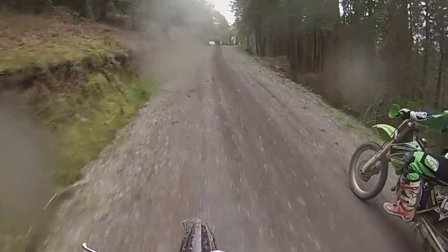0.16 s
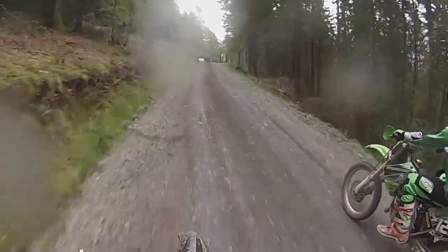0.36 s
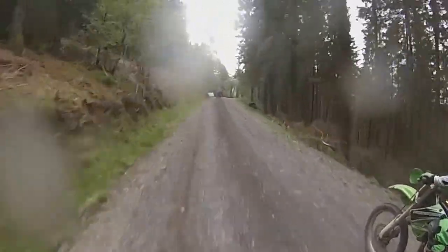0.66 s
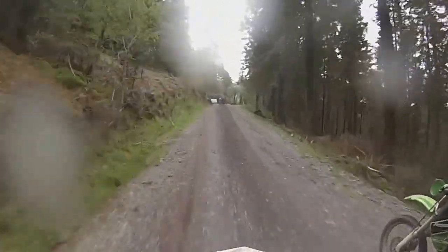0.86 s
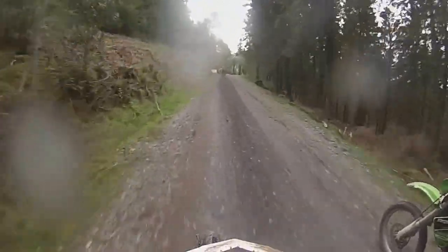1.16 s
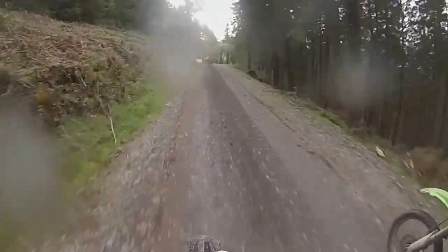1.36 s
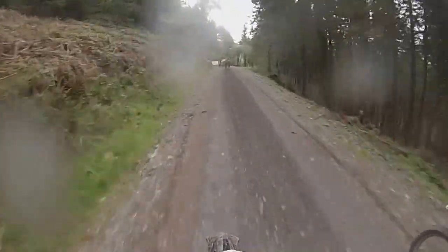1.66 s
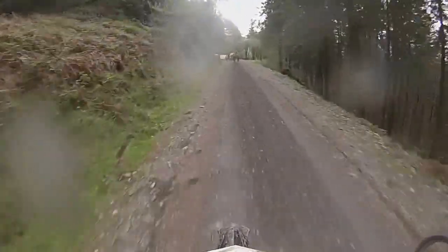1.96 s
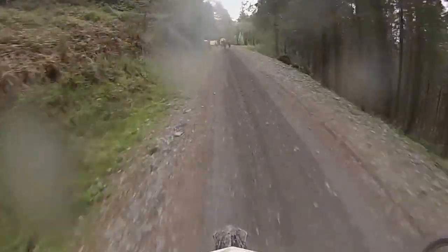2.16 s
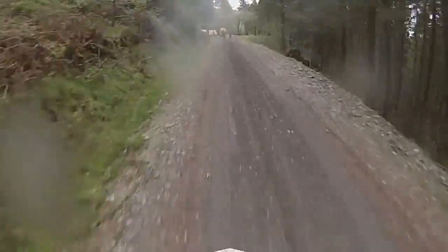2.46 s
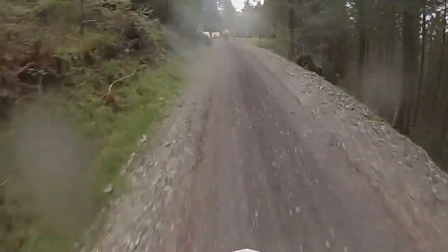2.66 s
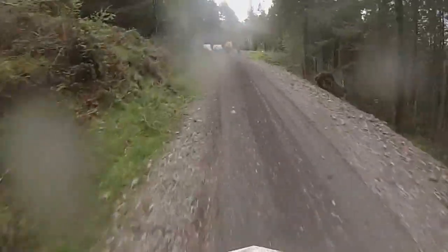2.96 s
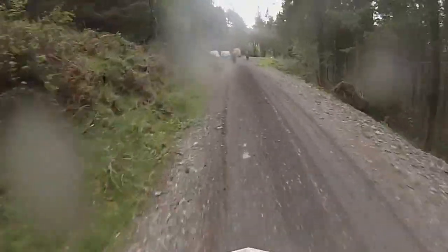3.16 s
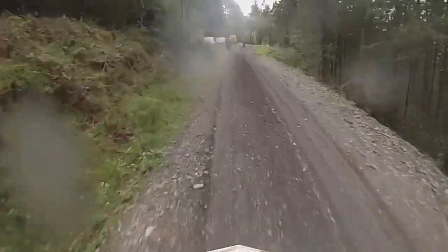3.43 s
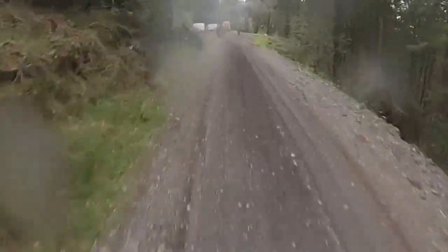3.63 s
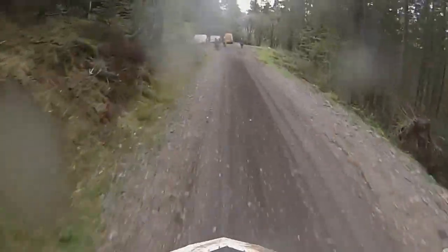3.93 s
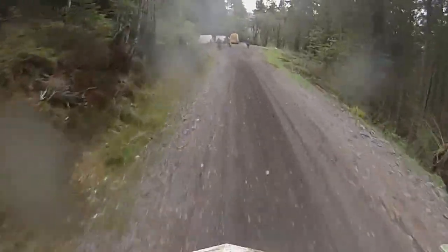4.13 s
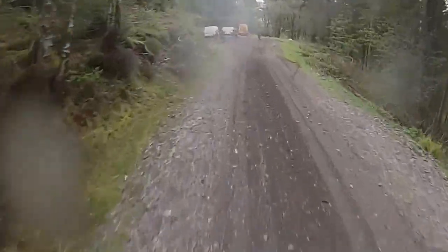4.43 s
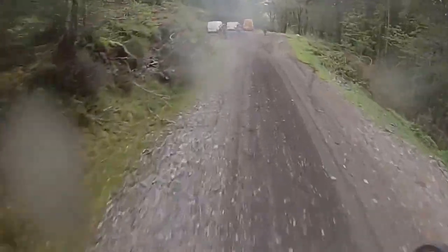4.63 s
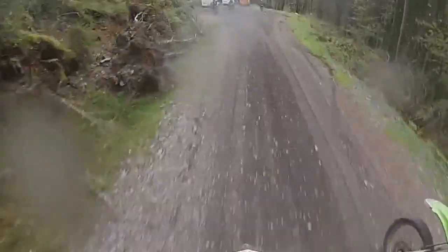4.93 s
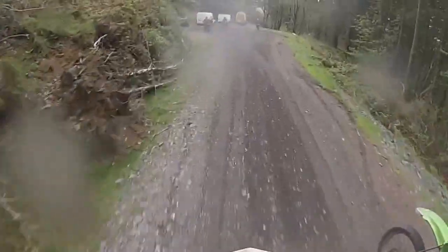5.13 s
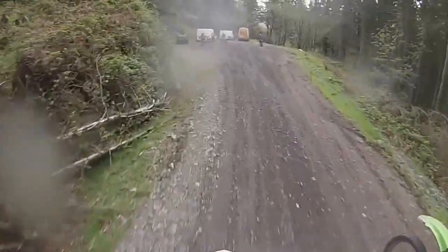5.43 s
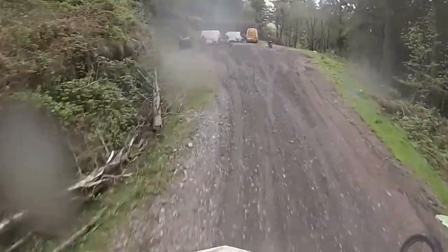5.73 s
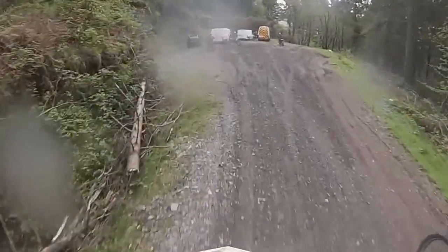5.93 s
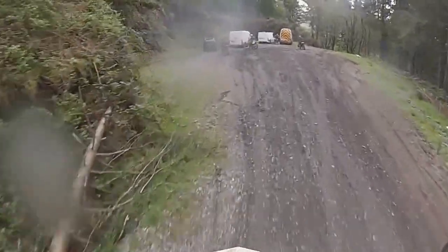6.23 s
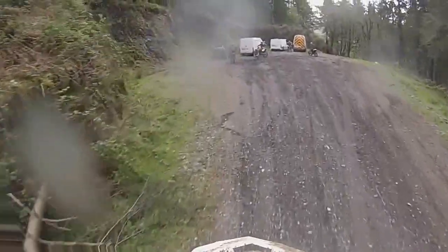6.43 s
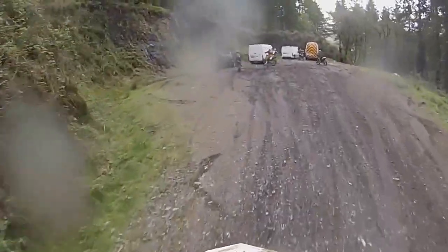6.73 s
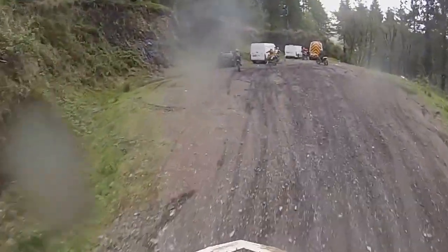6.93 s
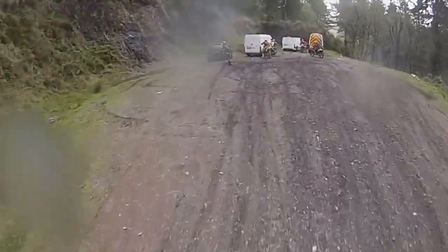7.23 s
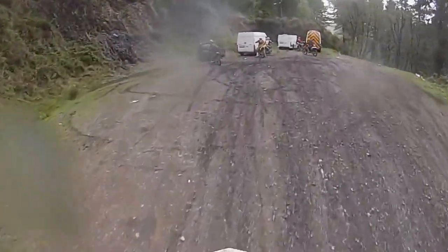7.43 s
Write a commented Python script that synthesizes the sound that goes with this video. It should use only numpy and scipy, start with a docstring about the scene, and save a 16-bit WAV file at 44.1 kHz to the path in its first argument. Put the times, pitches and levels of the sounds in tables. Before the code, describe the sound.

Heard from the rider's helmet, an off-road motorcycle's engine drone and wind rush fade as it slows over gravel, ending in slow exhaust thuds.

```python
"""A single-cylinder four-stroke dirt bike slows on a gravel forest track, heard from the rider's helmet.
First the exhaust drones as pulses ringing a silencer, while noise shaped as eddies booms in the helmet.
The throttle shuts, firing slows, and the rush of air, chain and tyres, noise ringing the camera case, fades.
Then stones knock a panel as struck resonances, stray firings pop, and noise in a narrow band sings as the disc.
Last, grit scuffs under the tyre and the exhaust settles into a thudding idle with an echo along the pipe."""
import sys
import numpy as np
from scipy import signal
from scipy.fft import rfft, irfft
from scipy.io import wavfile
from scipy.ndimage import uniform_filter1d

SR = 44100
rng = np.random.default_rng(int(sys.argv[2]) if len(sys.argv) > 2 else 0)


def file_out(sig):
    """Save sig as 16-bit WAV at sys.argv[1]."""
    # one column per channel
    cols = np.atleast_2d(sig).T
    # limit, then scale
    lim = np.clip(cols, -1, 1)
    pcm = np.round(lim * 32767).astype(np.int16)
    wavfile.write(sys.argv[1], SR, pcm)


N = 334719
T = np.arange(N) / SR  # time [s]

# Spectrum levels are relative. The half length of a swell runs from its peak to 1/e of its gain.

# Wind: eddies booming in the helmet (frequency [Hz], level [dB])
BOOM_SPECTRUM = [(30, -30), (70, -25), (95, -14), (108, -3), (118, 0), (132, -6), (155, -19), (200, -27),
                 (450, -32), (900, -46)]
# Wind: buffeting of the microphone (frequency [Hz], level [dB])
BUFFET_SPECTRUM = [(5, -14), (13, 0), (24, 0), (36, -5), (60, -12), (120, -26), (400, -50)]
# Eddies that boom in the helmet (time [s], half length [s], level [dB])
EDDIES = [(.15, 0.087, -29.5), (.46, .06, -26), (1.05, 0.065, -33), (1.31, 0.074, -35), (1.68, .05, -34),
          (1.94, 0.046, -31), (2.31, 0.033, -31.5)]
# Gusts on the microphone (time [s], half length [s], level [dB])
GUSTS = [(3.3, .1, -53), (4.08, .13, -40), (5, .14, -41), (5.52, .13, -45), (6.4, 0.48, -48)]
# Boom at the reference rush; dB lost for each dB that the rush loses; change at a crawl
BOOM_DB, BOOM_SLOPE, BOOM_CRAWL_DB = -33.5, 0.51, -4.5
BUFFET_START_DB, BUFFET_FALL_DB_PER_S = -47, 1
CRAWL_S, SLOWING_S = 6.95, 0.27  # the bike is down to a crawl by then, and takes this long to get there

# Resonances of the camera case (frequency [Hz], width [Hz], lift [dB])
CASE = [(1586, 220, 5.5), (2490, 50, -2), (2594, 100, 6), (4840, 110, 1.5), (5840, 570, 7),
        (6810, 160, -12), (7020, 490, 6), (8080, 260, -6), (11010, 450, -8.5), (12100, 500, -6)]

# Tyres drumming on the track (frequency [Hz], level [dB])
DRUM_SPECTRUM = [(35, -25), (60, -6), (88, -3), (110, -1), (160, -26.5), (400, -43)]
# Bursts of rumble from rough ground (time [s], half length [s], level [dB])
ROUGH_GROUND = [(4.15, .3, -42)]
DRUM_DB = -44

# Fine, sparkling treble crackle (frequency [Hz], level [dB])
CRACKLE_SPECTRUM = [(1500, -18), (4000, 1), (6000, 1), (8000, -10), (10000, -2), (15000, -5)]
CRACKLE_DB, CRACKLE_FLICKER_DB = -57, 4.5  # middle level; flicker for each unit of the wander

# Grit scuffing under the tyre (frequency [Hz], level [dB])
SCUFF_SPECTRUM = [(120, -19), (290, 16), (470, 10), (750, -8), (1500, -2), (4500, -1.5), (6200, -6),
                  (8000, -19), (10000, -8), (15000, -25)]
# Short scuffs of grit (time [s], half length [s], level [dB])
SCUFFS = [(7.138, 0.013, -33.5), (7.182, 0.029, -35.5)]

# Ring of the brake disc (frequency [Hz], level [dB])
DISC_SPECTRUM = [(600, -54), (1250, -25), (1490, -8.5), (1555, 2), (1620, -18), (1900, -19.5), (4000, -45)]
# Squeezes of the brake (time [s], half length [s], level [dB])
SQUEEZES = [(3.35, 0.29, -44), (6.5, 0.17, -47), (7.22, 0.047, -41)]
# The drag rises throughout, along a line through this level at this time, just past the end
DRAG_DB, DRAG_S, DRAG_RISE_DB_PER_S = -43.5, 7.8, 5

# Stones flung against the bike (time [s], peak level before a 0.5 dB lift and the skip's overlap [dB])
STONES = [(3.2142, -15.5), (4.596, -17.5), (4.629, -24), (4.711, -29), (4.747, -29), (6.709, -17.5)]
# Knock of a stone (frequency [Hz], level [dB])
STONE_SPECTRUM = [(400, -19), (800, -11), (1050, -0.5), (1600, 10), (2700, 1.5), (3500, -13), (8000, -21),
                  (15000, -36)]
# Resonances of the struck panel (frequency [Hz], width [Hz], lift [dB])
PANEL = [(1060, 99, 11), (1610, 180, 8), (2610, 230, 13.5)]
SKIP_S, SKIP_DB = 0.00167, -12  # each stone touches again, more softly

# Rush of air and chain, falling with road speed (time [s], level before a 1 dB cut and the bumps [dB])
RIDE = [(.6, -20.5), (.76, -19), (1, -21), (1.22, -19), (1.6, -25.5), (2.15, -26), (2.42, -29),
        (3.4, -34.5), (4.5, -39), (4.63, -36.5), (5.7, -40.5), (6.8, -42), (7.05, -46), (7.59, -45.5)]
# Rush of air, chain and clatter (frequency [Hz], level per Hz [dB])
RUSH_SPECTRUM = [(200, -9), (500, -25.5), (850, -22), (1150, -19), (1400, -5.5), (1700, -0.5), (2050, -1.5),
                 (2350, -4.5), (2900, -1), (3550, -1), (4100, -17.5), (6000, -26.5), (12000, -27),
                 (15000, -47)]
# Tyre hiss (frequency [Hz], level per Hz [dB])
HISS_SPECTRUM = [(200, 1), (500, 3), (850, -5), (1500, 3), (2500, 2.5), (3500, 0), (4600, -2.5), (6200, -5),
                 (7400, -12.5), (8100, -15.5), (9200, -13), (10300, -11.5), (13000, -15.5), (15200, -23)]
# Patches of loose gravel under the tyres (time [s], half length [s], level before the flicker [dB])
LOOSE_GRAVEL = [(.58, .15, -34.5), (5.5, 0.059, -50)]
FAST_RUSH_DB = -20  # reference rush, at which boom and hiss have their stated levels
HISS_DB, HISS_SLOPE = -29, 0.57  # hiss at the reference rush; dB lost for each dB that the rush loses
SLOW_RUSH_HZ = 3050  # a slow rush has lost most of what lies above this

# Gas churning in the pipe (frequency [Hz], level [dB])
GAS_SPECTRUM = [(90, -18), (190, 0), (250, -5.5), (320, 3), (390, -2.5), (500, -12.5), (640, -7.5),
                (900, -30), (2000, -28)]
# Standing waves of the silencer (frequency [Hz], width [Hz], lift [dB])
SILENCER = [(170.2, 66, 6.5), (300.5, 34, 5.5), (430, 100, 3)]
# Gurgles as the throttle shuts and as firing resumes (time [s], half length [s], level [dB])
GURGLES = [(.8, 0.15, -36), (5.12, 0.17, -57)]
CHURN_START_DB, CHURN_FALL_DB_PER_S, CHURN_CRAWL_DB = -45, 0.3, -1

# Stray firings while coasting (time [s], peak level before a 5.5 dB cut [dB])
POPS = [(4.333, -29), (5.026, -25), (5.15, -23), (5.274, -26), (5.402, -20.5), (5.532, -24), (6.055, -23),
        (6.301, -22), (6.457, -25), (6.503, -26), (6.734, -26.5), (6.826, -21), (6.927, -24.5), (6.98, -24),
        (7.085, -23.5), (7.195, -20.5)]
# One slow firing (frequency [Hz], level [dB])
THUD_SPECTRUM = [(25, -43), (50, -8), (85, 2), (165, 1.5), (280, 1.5), (345, -5.5), (440, 3), (520, -14),
                 (650, -37), (1000, -63), (2000, -49)]
PIPE_ECHO_S, PIPE_ECHO = 0.0123, 0.52  # delay and gain of the pulse returning along the pipe

# Engine speed (time [s], firing rate [Hz])
ENGINE = [(0.06, 55.2), (0.5, 57.7), (0.88, 54.3), (0.97, 50.7), (1.21, 51.7), (1.61, 50.1), (2.24, 46.3),
          (3.0, 41.5), (3.52, 40.6), (4.37, 35.4), (4.89, 33.4), (5.2, 31.5), (5.84, 29.3), (6.49, 25.4),
          (6.75, 20.8), (7.08, 18.6)]
# Exhaust under throttle (frequency [Hz], level [dB])
PULL_SPECTRUM = [(30, -34), (57, 11.5), (115, 19), (172, -9), (230, 4), (290, 1), (345, -1.5), (400, -16),
                 (460, -5.5), (630, -9), (740, -21), (1000, -28), (2000, -55)]
# Exhaust while coasting (frequency [Hz], level [dB])
COAST_SPECTRUM = [(30, -28), (50, -15), (66, -0.5), (100, -9.5), (125, -10.5), (168, 1.5), (205, -4),
                  (260, -4), (315, -13.5), (360, -16), (455, -5.5), (530, -18), (800, -27), (2000, -26)]
# Exhaust before the idle lifts it (time [s], body level [dB], bark level [dB])
EXHAUST = [(.45, -28.5, -28.5), (.7, -33, -31), (1, -29, -33), (2.2, -32.5, -39.5), (3.6, -35.5, -46.5),
           (4.7, -43.5, -58), (5.15, -40, -50), (5.7, -45.5, -56.5), (7.1, -49.5, -52)]
IDLE_BEAT_S = 7.354  # one nominal firing of the idle
THROTTLE_SHUT_S, THROTTLE_CLOSING_S = 0.947, 0.25  # shut by then, and takes this long to close
IDLE_CATCH_S, IDLE_CATCH_RISE_S = 7.29, 0.046  # the idle has caught by then, over this rise
IDLE_BODY_DB, IDLE_BARK_DB = 7, 5.5  # lift once the idle catches
WEAK_FIRING_HZ, WEAK_FIRING_PER_HZ = 33, 0.023  # below this rate, share of thud gained with each Hz lost
STEADY_SCATTER_DB, STUMBLE_SCATTER_DB = 1.04, 4.3  # unevenness of strokes: running cleanly, and stumbling
FULL_STUMBLE_HZ, NO_STUMBLE_HZ = 30, 44.3  # firing rates
TOP_HZ = 15250  # upper edge of the treble


def undb(db):
    """Amplitude gain is ten to the power of the decibels over twenty."""
    return 10 ** (np.asarray(db) / 20)


def unit(x):
    """Normalization of power: scale to rms 1."""
    return x / np.sqrt(np.mean(x ** 2))


def steady(x, span_s=.21):
    """Envelope flattening: hold the running rms near 1."""
    power = np.abs(uniform_filter1d(x ** 2, int(span_s * SR)))
    return x / np.sqrt(power + 1e-18)


def curves(table):
    """Linear interpolation in time of each column of a table."""
    s, *columns = np.transpose(table)
    return [np.interp(T, s, c) for c in columns]


def ramp(end_s, length_s):
    """Linear transition from 0 to 1, arriving at the given time."""
    return np.clip(1 + (T - end_s) / length_s, 0, 1)


def swells(table):
    """Superposition of Gaussian gains, one for each row (time [s], half length [s], level [dB])."""
    return sum(undb(db) * np.exp(-((T - s) / length) ** 2) for s, length, db in table)


def walk(rate):
    """Smoothed random steps: a wander with an rms near 0.7."""
    k = max(int(SR / rate), 2)
    steps = np.repeat(rng.standard_normal(N // k + 1), k)
    return 0.85 * uniform_filter1d(steps, k)[:N]


def response(points, bumps=(), size=8192):
    """Minimum phase: a magnitude spectrum with resonant bumps fixes a causal impulse response."""
    f = np.maximum(np.fft.rfftfreq(size, 1 / SR), 1)
    hz, db = np.transpose(points)
    db = np.interp(np.log(f), np.log(hz), db)
    # outside the given points the level falls by 12 dB per octave
    outside = np.maximum(f / hz[-1], 1) * np.maximum(hz[0] / f, 1)
    db = db - 40 * np.log10(outside)
    for centre, width, lift in bumps:
        db = db + lift / (1 + (2 * (f - centre) / width) ** 2)
    # folding the cepstrum onto positive time makes the response causal
    cepstrum = irfft(np.log(undb(db)))
    cepstrum[1:size // 2] *= 2
    cepstrum[size // 2 + 1:] = 0
    return irfft(np.exp(rfft(cepstrum)))


def ring(x, h):
    """Linear filtering: convolve an excitation with an impulse response."""
    return signal.oaconvolve(x, h)[:N]


def clicks(times, sizes):
    """Fractional delay: each impulse is shared between its two nearest samples."""
    at = np.clip(np.asarray(times) * SR, 0, N - 2)
    i = at.astype(int)
    early = np.bincount(i, sizes * (1 - at + i), N)
    late = np.bincount(i + 1, sizes * (at - i), N)
    return early + late


def grit(per_s, spread_db):
    """Shot noise: dense tiny impacts of very unequal size and random sign."""
    chance = rng.random((int(per_s * N / SR), 3))
    size_db = -spread_db * np.log(np.maximum(chance[:, 1], .002))
    sizes = undb(size_db) * np.sign(chance[:, 2] - .5)
    return unit(clicks(chance[:, 0] * N / SR, sizes))


def wind():
    """Turbulence: eddies boom in the helmet's hollow and buffet the microphone, easing as the bike slows."""
    rush_db, = curves(RIDE)
    boom_db = BOOM_DB + BOOM_SLOPE * (rush_db - FAST_RUSH_DB)
    boom_db = boom_db + BOOM_CRAWL_DB * ramp(CRAWL_S, SLOWING_S)
    boom = steady(ring(rng.standard_normal(N), response(BOOM_SPECTRUM)))
    buffet_db = BUFFET_START_DB - BUFFET_FALL_DB_PER_S * T
    buffet = steady(ring(rng.standard_normal(N), response(BUFFET_SPECTRUM)))
    return boom * (undb(boom_db) + swells(EDDIES)) + buffet * (undb(buffet_db) + swells(GUSTS))


def drumming():
    """Random forcing: knobbly tyres drum on the hard track until the bike is down to a crawl."""
    level = undb(DRUM_DB) * (1 - ramp(CRAWL_S, SLOWING_S)) + swells(ROUGH_GROUND)
    return unit(ring(rng.standard_normal(N), response(DRUM_SPECTRUM))) * level


def crackle():
    """Shot noise: a fine, sparkling treble crackle that flickers in level and ends at a crawl."""
    level = undb(CRACKLE_DB + CRACKLE_FLICKER_DB * walk(28)) * (1 - ramp(CRAWL_S, SLOWING_S))
    sparkle = ring(grit(per_s=3000, spread_db=1.0), response(CRACKLE_SPECTRUM, CASE))
    return unit(sparkle) * level


def scuffing():
    """Friction noise: grit scuffs under the tyre in short bursts."""
    return unit(ring(rng.standard_normal(N), response(SCUFF_SPECTRUM, CASE))) * swells(SCUFFS)


def braking():
    """Resonance under random friction: the dragging pads set the brake disc singing."""
    drag = undb(DRAG_DB - DRAG_RISE_DB_PER_S * (DRAG_S - T))
    disc = steady(ring(rng.standard_normal(N), response(DISC_SPECTRUM)), span_s=0.1)
    return disc * (drag + swells(SQUEEZES))


def stones():
    """Impulse excitation: single stones strike the resonances of a panel and skip once."""
    s, db = np.transpose(STONES)
    h = response(STONE_SPECTRUM, PANEL)
    hits = clicks(s, undb(db + 0.5)) + clicks(s + SKIP_S, undb(db + SKIP_DB))
    return ring(hits, h / np.abs(h).max())


def rolling(cycle):
    """Broadband excitation: air, chain and engine clatter rush; tyres hiss and crackle over the gravel."""
    rush_db, = curves(RIDE)
    clatter = 1 + 0.054 * np.cos(2 * np.pi * cycle)
    rush_source = rng.standard_normal(N) + 0.43 * grit(per_s=2500, spread_db=1.4)
    rush = ring(rush_source * clatter, response(RUSH_SPECTRUM, CASE))
    # the rush gets duller as it gets weaker
    lowpass = signal.butter(2, SLOW_RUSH_HZ, fs=SR, output="sos")
    dull = signal.sosfiltfilt(lowpass, rush)
    speed = np.interp(rush_db, [-38, -22], [0, 1])
    rush = steady(dull + speed * (rush - dull))

    hiss_source = rng.standard_normal(N) + 0.62 * grit(per_s=1800, spread_db=2.5)
    hiss = unit(ring(hiss_source, response(HISS_SPECTRUM, CASE)))
    tyres = undb(HISS_DB + HISS_SLOPE * (rush_db - FAST_RUSH_DB)) + swells(LOOSE_GRAVEL)
    # the uneven track shakes both; the hiss also flickers by itself
    bumps = 0.72 * walk(25) + 0.96 * walk(90)
    rush_gain = undb(rush_db - 1.0 + 1.4 * bumps)
    hiss_gain = tyres * undb(.5 * bumps + 0.83 * walk(45))
    return rush * rush_gain + hiss * hiss_gain


def churn(cycle):
    """Modulated turbulence: gas puffs through the silencer once per engine cycle."""
    flow_db = CHURN_START_DB - CHURN_FALL_DB_PER_S * T + CHURN_CRAWL_DB * ramp(CRAWL_S, SLOWING_S)
    puffs = 1 + 0.43 * np.sin(2 * np.pi * cycle)
    gas = steady(ring(rng.standard_normal(N) * puffs, response(GAS_SPECTRUM, SILENCER)))
    return gas * (undb(flow_db) + swells(GURGLES))


def thud():
    """Reflection: the pressure pulse of one slow firing and its return along the pipe."""
    h = response(THUD_SPECTRUM)
    lag = np.arange(len(h))
    return h + PIPE_ECHO * np.interp(lag - PIPE_ECHO_S * SR, lag, h, left=0)


def pops():
    """Impulse response of the pipe: now and then the lean mixture catches on the closed throttle."""
    s, db = np.transpose(POPS)
    h = thud()
    return ring(clicks(s, undb(db - 5.5)), h / np.abs(h).max())


def combustion(hz):
    """Irregular combustion: throttle and idle shares, and stroke scatter [dB] that grows as coasting slows."""
    pull = 1 - ramp(THROTTLE_SHUT_S, THROTTLE_CLOSING_S)
    caught = ramp(IDLE_CATCH_S, IDLE_CATCH_RISE_S)
    # a slow coasting engine already burns a little
    weak_firing = (WEAK_FIRING_HZ - hz) * WEAK_FIRING_PER_HZ
    idle = np.clip(np.maximum(caught, weak_firing), 0, 1)
    stumble = np.interp(hz, [FULL_STUMBLE_HZ, NO_STUMBLE_HZ], [1, 0]) * (1 - caught)
    scatter_db = STEADY_SCATTER_DB + stumble * (STUMBLE_SCATTER_DB - STEADY_SCATTER_DB)
    return pull, idle, scatter_db


def exhaust(cycle, hz):
    """Pulse train through resonators: one uneven pulse per cycle rings the throttle, coast or idle response."""
    pull, idle, scatter_db = combustion(hz)
    strokes = np.arange(np.ceil(cycle[0]), cycle[-1])
    chance = rng.standard_normal((len(strokes), 2))
    times = np.interp(strokes + .002 * chance[:, 0], cycle, T)
    pulses = clicks(times, undb(np.interp(times, T, scatter_db) * chance[:, 1]))

    pipe = ring(pulses * pull, response(PULL_SPECTRUM, SILENCER))
    pipe = pipe + ring(pulses * (1 - pull) * (1 - idle), response(COAST_SPECTRUM, SILENCER))
    pipe = pipe + ring(pulses * idle, thud())

    # pumped air makes the low body; burning strokes make the bark above it
    lowpass = signal.butter(4, 235, fs=SR, output="sos")
    body = signal.sosfiltfilt(lowpass, pipe)
    bark = pipe - body
    body_db, bark_db = curves(EXHAUST)
    caught = ramp(IDLE_CATCH_S, IDLE_CATCH_RISE_S)
    body_gain = undb(body_db + IDLE_BODY_DB * caught)
    bark_gain = undb(bark_db + IDLE_BARK_DB * caught)
    return steady(body) * body_gain + steady(bark) * bark_gain


def scene():
    """Superposition: one engine phase drives exhaust, churn and clatter; all sources add, close and dry."""
    hz, = curves(ENGINE)
    cycle = np.cumsum(hz) / SR
    cycle = cycle - np.interp(IDLE_BEAT_S, T, cycle)  # a whole cycle falls on the idle beat
    surroundings = wind() + drumming() + crackle() + scuffing() + braking() + stones()
    machine = rolling(cycle) + churn(cycle) + pops() + exhaust(cycle, hz)
    return (surroundings + machine)[None]


def record(dry):
    """Band limiting: a steep elliptic low-pass ends the treble at TOP_HZ."""
    lowpass = signal.ellip(14, .2, 80, TOP_HZ, fs=SR, output="sos")
    return signal.sosfilt(lowpass, dry)


dry = scene()
out = record(dry)
file_out(out)
```